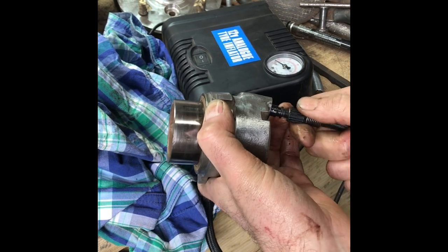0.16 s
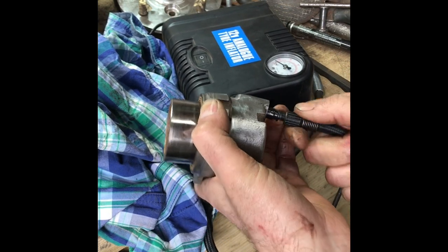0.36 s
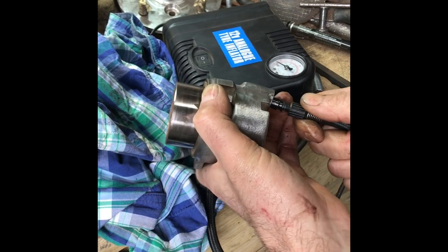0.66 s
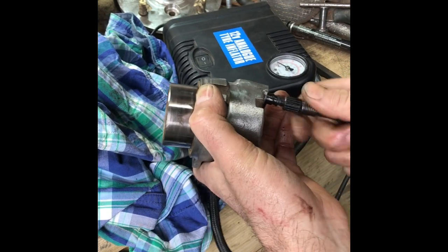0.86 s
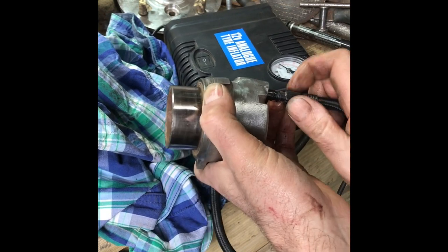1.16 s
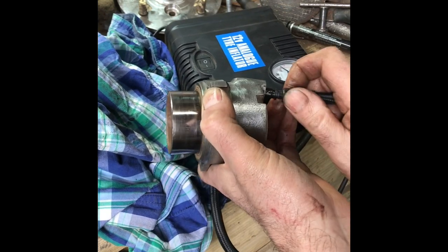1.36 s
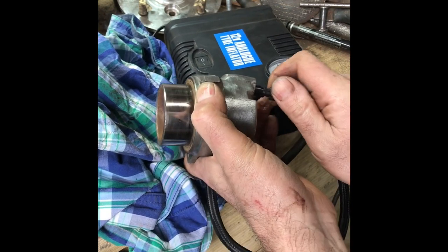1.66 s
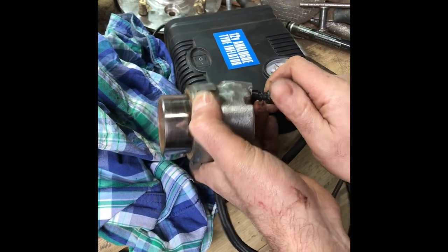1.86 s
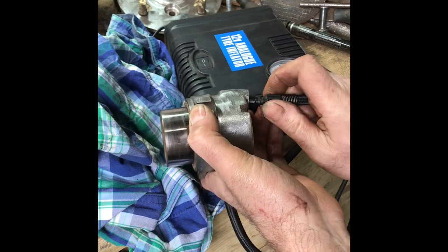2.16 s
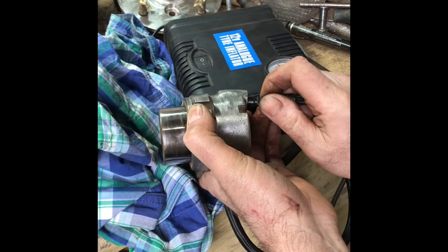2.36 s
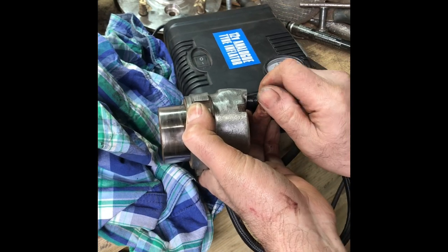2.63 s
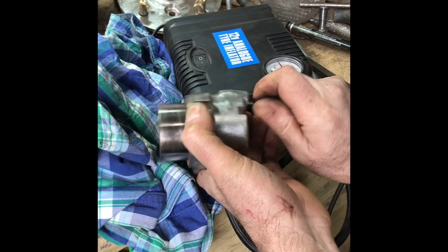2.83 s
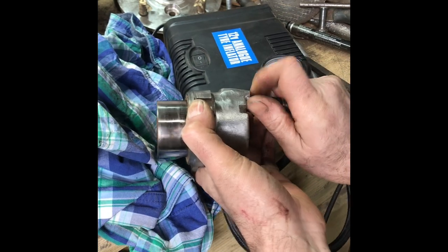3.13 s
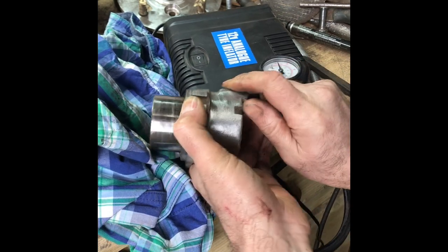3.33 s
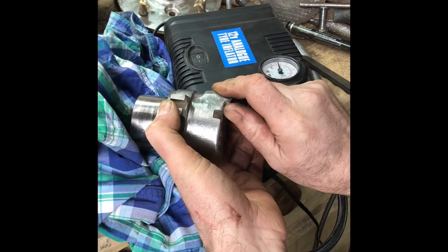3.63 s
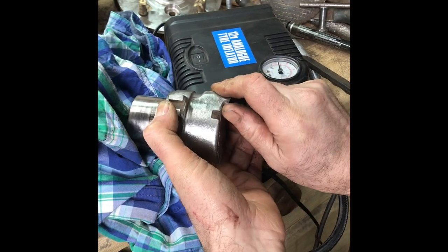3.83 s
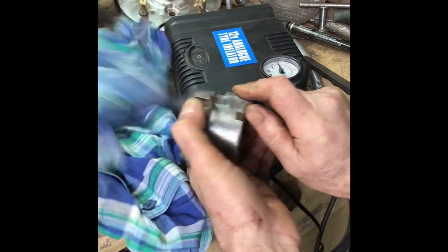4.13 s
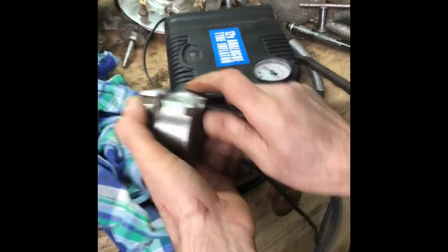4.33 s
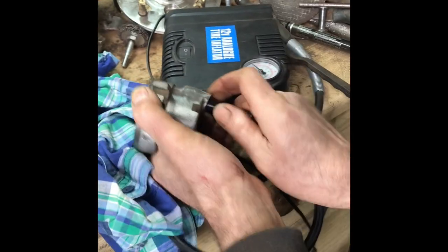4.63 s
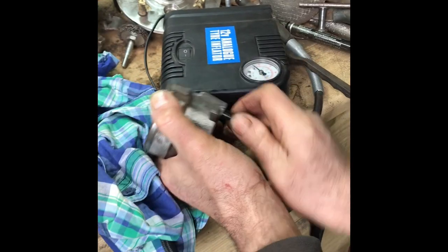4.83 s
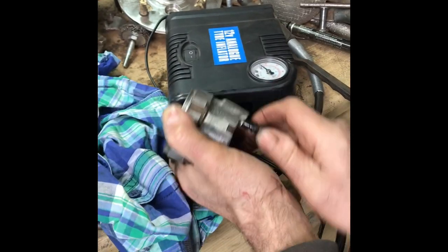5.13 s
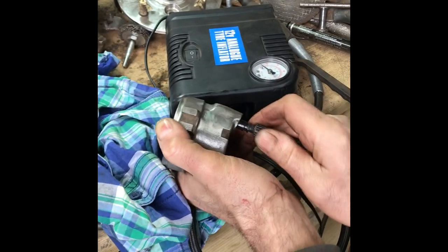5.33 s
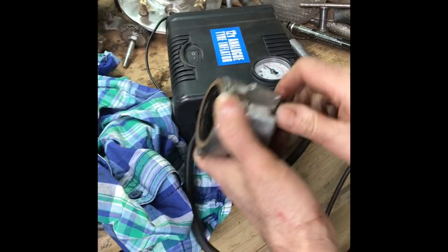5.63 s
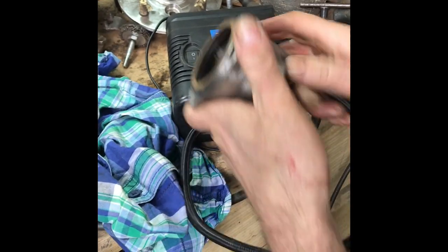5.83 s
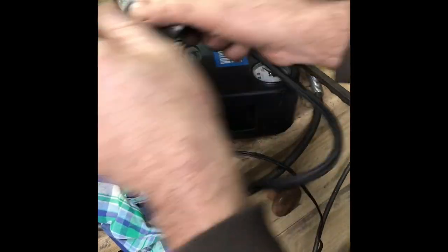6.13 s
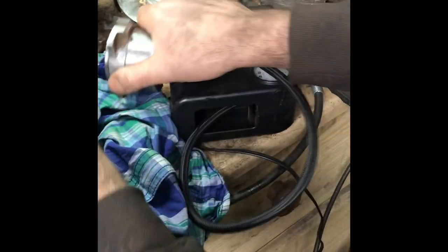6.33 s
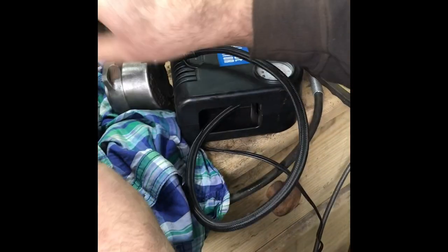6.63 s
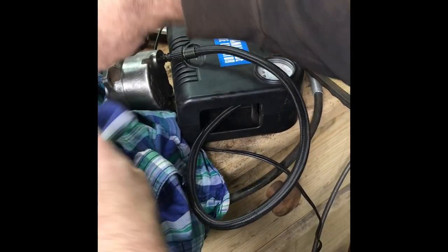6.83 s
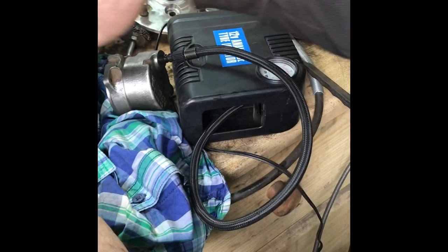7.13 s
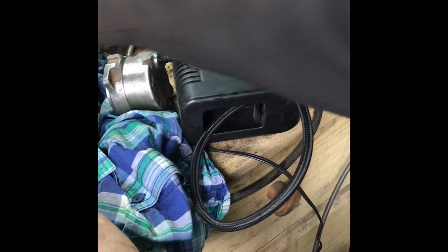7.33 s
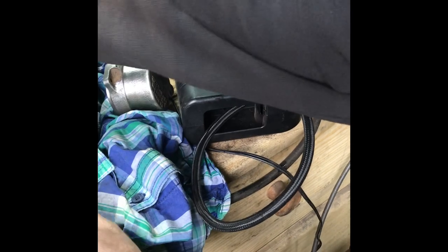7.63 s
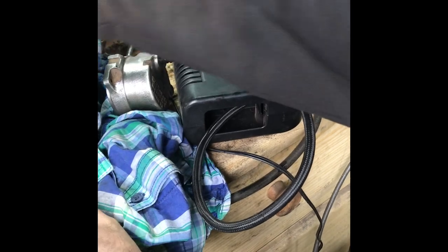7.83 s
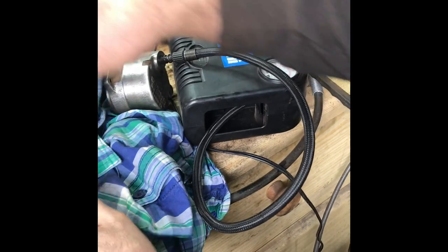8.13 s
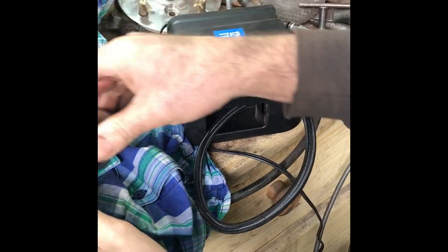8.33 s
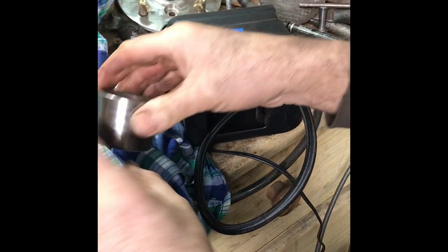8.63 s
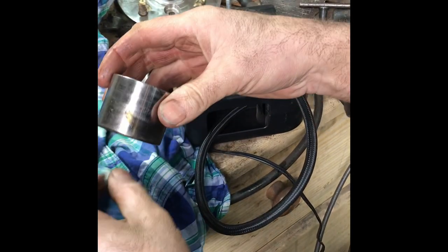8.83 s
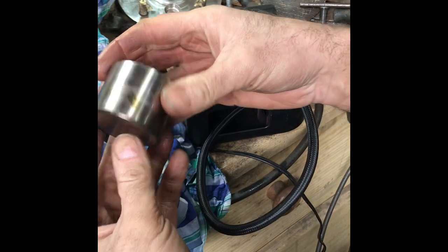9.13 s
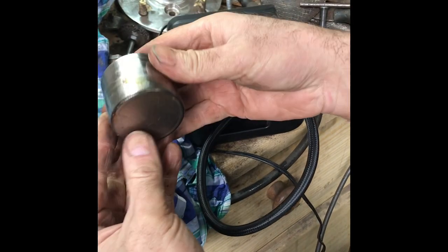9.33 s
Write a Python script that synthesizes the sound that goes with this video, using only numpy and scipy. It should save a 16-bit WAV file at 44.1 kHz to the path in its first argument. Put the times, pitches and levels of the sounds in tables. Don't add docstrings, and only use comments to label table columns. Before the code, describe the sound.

A small portable air compressor rattles fast and harsh on a wooden bench, with valve hiss and gear whine. It slows slightly under rising pressure, then a plug pops out with a hard hollow knock. The sound ducks suddenly, then swells back as the pump runs faster with hose puffs. A metal part thuds down and small pieces tinkle. Close, dry handheld microphone.

```python
import sys
import numpy as np
from scipy import signal
from scipy.fft import rfft, irfft
from scipy.io import wavfile
from scipy.ndimage import uniform_filter1d

SR = 44100
rng = np.random.default_rng(int(sys.argv[2]) if len(sys.argv) > 2 else 0)


def attenuation_scalar(level_db):
    decades = np.asarray(level_db, float) / 20
    return 10 ** decades


def wav_out(sig):
    wavfile.write(sys.argv[1], SR, np.round(np.clip(np.atleast_2d(sig).T, -1, 1) * 32767).astype(np.int16))


N = 418068

START_TURN, POP_S = .36, 4.105
LIGHT_TPS, FULL_TPS = 40.8, 39.1
PUMP_DB = -15.5
TEETH = 26
SWELL_DB = 0.55
JOLT_DB, JOLT_S = 15, 0.039
LEAN_REST_DB, RUB_REST_DB, EDGE_S = -55.5, -44.5, 0.054

# time_s, turns_per_s
CRANK_SPEED = [(0.0, 41.66), (0.8, 42.26), (1.2, 41.53), (1.6, 42.02), (2.0, 40.79), (2.3, 41.08),
               (2.45, 40.83), (2.8, 39.41), (3.4, 38.96), (4.1, 38.91), (4.17, 43.55), (4.3, 45.17),
               (4.8, 45.02), (5.4, 45.03), (5.8, 45.23), (6.6, 45.24), (7.4, 45.12), (9.48, 45.26)]
# turn, level_db
CONTACTS = [
    [(-.45, -3), (-.27, -40), (-.21, 1), (-.15, -16.5), (-.09, 13), (.0, -2), (.3, -2)],
    [(-.44, 0), (-.34, 2.5), (-.265, 0.5), (-.225, -1.5), (-.185, 4.5), (-.085, 6), (.12, 3)],
    [(-.56, -7), (-.529, -3), (-.498, 0), (-.467, -1), (-.2, -13), (.05, -14), (.25, -14)],
    [(-.5, -4), (-.37, -0.5), (-.24, -14), (-.11, -5), (.0, -14), (.14, -14), (.32, -6.5)],
]
# pitch_hz, width_hz, level_db
LOADED_MODES = [
    [(379, 16, -23.5), (399, 47, -8), (480, 160, -7.5), (606, 36, -7), (719.6, 68, 1.5), (806, 27, -10)],
    [(1054, 57, 13.5), (1234, 220, -0.5), (908, 150, 10)],
    [(1570, 120, 0)],
    [(1781, 32, 3.5), (1705, 69, 4), (1967, 33, -3), (2100, 21, -9)],
]
# pitch_hz, width_hz, level_db
FREE_MODES = [
    [(370.4, 18, -5.5), (452, 49, -8), (575.5, 35, -8), (595, 110, -8.5), (679.4, 55, 6), (816.6, 15, -1)],
    [(1127, 150, -10.5), (1048, 290, -4), (953, 67, -6.5)],
    [(1450, 70, 0)],
    [(1648, 82, 10.5), (1784, 54, 2), (2060, 31, 1)],
]
UNEVEN_DB = [2, 3, 4.5, 4]
GRIND_DB = [-7, -6, -7, -5]
# pitch_hz, width_hz
CONTACT_FOCUS = [
    (560, 1050),
    (1100, 520),
    (1470, 280),
    (1850, 800),
]
FLUTTER_DB = [0, 0, 3.5, 0]
BEARING_PLAY = (.15, .17, .33, 0)
# light_db, full_db, free_db, clear_gain_db (gained with the vents clear)
PART_LEVELS = [
    (-4.5, -5, -4.5, 2.5),
    (-3, -7.5, -6.5, 1.9),
    (-17, -8.5, -17.5, 7.5),
    (-12, -8, -10.5, -1),
]
# turn, low_hiss_db, high_hiss_db, whine_db, tooth_tone_db
BREATH = [(0, 0, 1, -11, 10), (.15, 1, -0.5, -11, 0), (.3, -0.5, 0.5, 5, -1), (.45, 2, 3, 5, -5.5),
          (.6, 1, 2, 9.5, -11), (.7, 6.5, 6, -1.5, -62), (.85, 5.5, 4.5, 4.5, 2), (1, 4.5, -4, -4, 10)]
MESH_DB = [-23.5, -34]
# pitch_hz, level_db (per Hz)
HISS_COLOUR = [(1290, 22), (2200, 6.5), (2770, 0.5), (2930, 0), (3910, -1), (4430, -4), (4800, -3.5),
               (7130, -7.5), (7740, -12.5), (8540, -10), (10400, -15.5), (11600, -13), (15700, -8.5)]
# pitch_hz, width_hz, loaded_gain_db, free_gain_db
HISS_PEAKS = [(2612, 40, 4.5, 4.5), (2952, 48, 10, 7.5), (3340, 64, 5, 4), (3645, 35, 4.5, 6.5),
              (4530, 66, 2.5, 0), (4960, 62, 2.5, 3.5), (5240, 95, 8.5, 3), (5960, 140, 5.5, 6),
              (6350, 90, 1.5, 1.5), (7100, 130, 2, 6.5), (10600, 250, -3.5, -2.5), (11400, 720, 2, 5.5),
              (13700, 590, -1, 1)]
# light_db, full_db, free_db, clear_gain_db
AIR_LEVELS = [
    (-7.5, -7.5, -8, 0),
    (-13, -13, -13, 1.7),
    (-20, -15, -16.5, 5),
]
# light_hz, full_hz, free_hz, clear_gain_hz
WHINE_HZ = (4430, 4280, 4450, 15)
# light_hz, full_hz, free_hz, clear_gain_hz
WANDER_HZ = (15, 12, 55, 10)
# time_s, level_db (against the whine)
WHISTLE_LEVEL = [(0, -22), (5.5, -17), (6.3, -9), (9.48, -14)]
# pitch_hz, width_hz
WHISTLE_MODE = (7280, 180)
SHAKE_MULTIPLES = (1, 3, 4, 5, 6, 7)
# light_db, full_db, free_db, clear_gain_db
SHAKE_LEVELS = [(-47, -39, -34.5, 3), (-56, -38, -32, 6), (-34.5, -29, -37.5, -10), (-33, -34.5, -31, 2.5),
                (-28, -32, -33, 4.5), (-40.5, -28, -44.5, 3)]
# start_s, length_s, level_db (at twice the crank speed)
LEANS = [(-.1, 1.4, -41.5), (1.36, 0.24, -39), (1.62, .38, -36.5), (2.24, .3, -37), (2.5, 0.39, -46),
         (2.86, .4, -42), (4.5, 0.36, -52), (5, 1.05, -48), (6.26, 0.23, -39), (6.66, 3.1, -39.5)]
# start_s, length_s, level_db
RUBS = [(1.1, .2, -44), (1.3, 0.37, -37), (1.7, .25, -44), (1.97, 0.35, -37), (2.85, .2, -47),
        (3.1, 1, -46), (4.32, 0.15, -45), (5.05, .35, -50), (5.6, 0.28, -56), (6.3, .35, -41)]
# time_s, clear_share (0 to 1)
VENTS_CLEAR = [(0, 0.22), (5.6, 0.04), (6.5, 0.52), (7.4, 1), (8.1, 0.88), (8.5, 0.87), (9.48, 0.67)]
# time_s, level_db
PANEL_REFLECTION = [(0, 2.1), (2.2, -1), (2.7, 1.3), (4.1, 0.2), (4.25, -1), (4.6, -0.5), (5.1, -0.3),
                    (6.2, 1.7), (7.4, -2), (8.2, 2.6), (9.48, 2.5)]
# time_s, level_db
HOSE_AIM = [(4.1, 0.2), (4.2, 12), (4.45, 12.5), (4.7, 9.5), (5.5, 5), (5.87, 15), (6.1, 9.5), (6.4, 9),
            (6.55, 0.5), (8, -7.5)]
# since_pop_s, level_db
DUCK = [(0, 0), (.001, -8), (.07, -12), (.13, -16), (.2, -14.5), (.225, -8.5), (.47, -8), (1.1, -2.5),
        (1.9, -0.68)]
# start_s, peak_db, brightness_hz
POP_KNOCKS = [(4.1045, -4, 8900), (4.1062, 3.5, 1490), (4.112, -3, 1430), (4.118, -1, 900),
              (4.131, -7, 1300), (4.151, -11, 700), (4.162, -36, 900), (4.186, -25, 1530),
              (4.203, -26, 1410)]
# start_s, peak_db, brightness_hz
THUD_KNOCKS = [(4.221, -21, 300), (4.335, -25, 200), (4.37, -47, 200), (4.392, -36, 100), (6.28, -35, 150),
               (6.455, -18, 252), (6.473, 0, 350), (6.492, -17, 250), (6.515, -24, 200), (6.54, -21, 150)]
# start_s, peak_db, brightness_hz
TINKS = [(6.245, -17, 15000), (8.2, -27, 15400), (8.29, -14, 15000), (8.31, -22, 13000)]
# pitch_hz, level_db, t60_s (time to fade by 60 dB)
CYLINDER_MODES = [(150, -14.5, 0.17), (263, -6.5, 0.16), (327, 1, 0.04), (436, 5.5, 0.043),
                  (595, -6, 0.052), (880, 6, 0.024), (1244, 3, 0.063), (1470, -6, 0.045), (3500, 5, 0.009),
                  (5000, 8, 0.009)]
# pitch_hz, level_db, t60_s
BENCH_MODES = [(86.4, -2, 0.18), (145, 1.5, 0.15), (198, -3, 0.072), (300, -10, 0.062)]
# pitch_hz, level_db, t60_s
METAL_MODES = [(5770, -3, .06), (6340, -5, .05), (7140, 5, 0.11), (7350, -4, .08), (8400, 2, .04)]


def unit(x):
    return x / np.sqrt(np.mean(x ** 2) + 1e-20)


def columns(rows, at):
    first, *rest = np.transpose(rows)
    return [np.interp(at, first, c) for c in rest]


def over_time(table):
    return columns(table, np.arange(N) / SR)[0]


def highpass(x, order, cutoff_hz):
    return signal.sosfilt(signal.butter(order, cutoff_hz, "high", fs=SR, output="sos"), x)


def resonate(x, hz, width_hz):
    r = np.exp(-np.pi * width_hz / SR)
    gain = (1 - r * r) / 2
    return signal.lfilter([gain, 0, -gain], [1, -2 * r * np.cos(2 * np.pi * hz / SR), r * r], x)


def band(low_hz, high_hz, order=3):
    sos = signal.butter(order, [low_hz, high_hz], "band", fs=SR, output="sos")
    return unit(signal.sosfilt(sos, rng.standard_normal(N)))


def state(speed, light, full, free, clear_gain):
    loaded = np.interp(-speed, [-LIGHT_TPS, -FULL_TPS], [light, full])
    return np.where(np.arange(N) < POP_S * SR, loaded, free + clear_gain * over_time(VENTS_CLEAR))


def touches(rows, rest_db):
    t = np.arange(N) / SR
    gain = attenuation_scalar(rest_db)
    for start_s, length_s, db in rows:
        nearest_edge = np.minimum(t - start_s, start_s + length_s - t)
        gain = gain + attenuation_scalar(db) * np.clip(nearest_edge / EDGE_S, 0, 1)
    return gain


def contact_force(k, turns, loose):
    angle, strength_db = np.transpose(CONTACTS[k])
    whole = np.arange(1, int(turns[-1]) + 1)[:, None]
    timing, strength, each = rng.standard_normal((3, len(whole), len(angle)))
    creep = 3 * uniform_filter1d(timing, size=25, axis=0)
    at = np.interp(whole + angle, turns, np.arange(N)).astype(int)
    slip = .0003 * SR * loose[at] * (creep + timing)
    size_db = strength_db + UNEVEN_DB[k] * loose[at] * (strength[:, :1] + 0.4 * each)
    size_db = size_db + FLUTTER_DB[k] * (-1.) ** whole * (at > round(POP_S * SR))
    force = np.zeros(N)
    np.add.at(force, np.clip(at + slip.astype(int), 0, N - 1), attenuation_scalar(size_db))
    return unit(force)


def pump(turns, speed, overall, parts):
    loose = state(speed, *BEARING_PLAY)
    grind = rng.standard_normal(N) * attenuation_scalar(columns(BREATH, turns % 1)[0]) * np.sqrt(2 * loose)
    split = round(POP_S * SR)
    out = 0
    for k, part_db in enumerate(parts):
        force = contact_force(k, turns, loose) + attenuation_scalar(GRIND_DB[k]) * grind
        force = resonate(force, *CONTACT_FOCUS[k])
        sound = np.zeros(N)
        for modes, span in ((LOADED_MODES[k], slice(0, split)), (FREE_MODES[k], slice(split, N))):
            rung = sum(attenuation_scalar(db) * resonate(force, hz, width) for hz, width, db in modes)
            sound[span] = unit(rung[span])
        out = out + attenuation_scalar(overall + part_db) * sound
    return highpass(out, 6, 322)


def gears(turns, overall):
    angle = 2 * np.pi * TEETH * (turns + 0.0027 * np.sin(2 * np.pi * (turns + 0.24)))
    tone = sum(attenuation_scalar(db) * np.sin((k + 1) * angle) for k, db in enumerate(MESH_DB))
    return tone * attenuation_scalar(overall + 11.0 + columns(BREATH, turns % 1)[3])


def hiss():
    hz = np.fft.rfftfreq(N, 1 / SR) + 1
    colour = columns([(np.log(f), d) for f, d in HISS_COLOUR], np.log(hz))[0]
    grit = attenuation_scalar(2.2 * np.minimum(rng.exponential(1, N), 5))
    noise = rfft(rng.standard_normal(N) * grit)
    upper = 1 / (1 + (6500 / hz) ** 12)
    lower = (1 - upper) / (1 + (2200 / hz) ** 12)
    loaded = np.arange(N) < POP_S * SR
    low, high = np.zeros((2, N))
    for k, span in enumerate((loaded, ~loaded)):
        peaks = sum(db[k] / (1 + (2 * (hz - f) / w) ** 2) for f, w, *db in HISS_PEAKS)
        shaped = noise * attenuation_scalar(colour + peaks)
        low[span] = unit(irfft(shaped * lower, N))[span]
        high[span] = unit(irfft(shaped * upper, N))[span]
    return low, high


def case_whine(speed):
    wobble = 1.8 + band(20, 86, order=1) + 1j * band(17.0, 63, order=1)
    pitch = state(speed, *WHINE_HZ) + state(speed, *WANDER_HZ) * band(3.02, 62, order=1)
    return unit((wobble * np.exp(2j * np.pi * np.cumsum(pitch) / SR)).real)


def vent_whistle():
    noise = rng.standard_normal(N)
    return unit(resonate(resonate(noise, *WHISTLE_MODE), *WHISTLE_MODE))


def air(turns, speed, overall):
    low_db, high_db, whine_db = (state(speed, *row) for row in AIR_LEVELS)
    gate_low, gate_high, gate_whine, _ = columns(BREATH, turns % 1)
    low, high = hiss()
    low = low * attenuation_scalar(low_db - 4.0 + gate_low)
    high = high * attenuation_scalar(high_db + gate_high + SWELL_DB * band(2.3, 10.4, order=1))
    whine = case_whine(speed) * attenuation_scalar(whine_db - 5.5 + gate_whine)
    whistle = vent_whistle() * attenuation_scalar(whine_db + over_time(WHISTLE_LEVEL) + gate_high)
    return (low + high + whine + whistle) * attenuation_scalar(overall)


def bench_shake(turns, speed, overall):
    gains = [touches(LEANS, LEAN_REST_DB)]
    gains += [attenuation_scalar(overall + state(speed, *row)) for row in SHAKE_LEVELS]
    shake = 0
    for k, gain in zip((2, *SHAKE_MULTIPLES), gains):
        shake = shake + np.sqrt(2) * gain * np.sin(2 * np.pi * k * turns + k * k)
    return shake


def rubbing_hands():
    lumps = attenuation_scalar(-2.0 + 1.4 * band(15, 16.7, order=1))
    return band(65, 288) * touches(RUBS, RUB_REST_DB) * lumps


def knocks(events, modes):
    out = np.zeros(N)
    t = np.arange(SR // 2) / SR
    for start_s, peak_db, bright_hz in events:
        ring = 0
        for (hz, level, t60), vary_db in zip(modes, rng.normal(0, 1.8, len(modes))):
            fade = attenuation_scalar(level + vary_db - 60 * t / t60)
            ring = ring + fade * np.sin(2 * np.pi * hz * t) / (1 + (hz / bright_hz) ** 2)
        ring = ring * (1 - np.exp(-t * 5.4 * bright_hz))
        i = round(start_s * SR)
        out[i:i + len(t)] -= attenuation_scalar(peak_db) * ring / np.abs(ring).max()
    return out


def scene():
    speed = over_time(CRANK_SPEED)
    since_pop = np.arange(N) / SR - POP_S
    turns = START_TURN + np.cumsum(speed) / SR
    overall = PUMP_DB + columns(DUCK, since_pop)[0]
    thump, case, hose, valve = (state(speed, *row) for row in PART_LEVELS)
    jolt = JOLT_DB * (since_pop > 0) * np.clip(1.5 - since_pop / JOLT_S, 0, 1)
    case = case + over_time(PANEL_REFLECTION) + jolt
    hose = hose + over_time(HOSE_AIM)
    machine = pump(turns, speed, overall, (thump, case, hose, valve))
    machine = machine + gears(turns, overall) + air(turns, speed, overall)
    machine = machine + bench_shake(turns, speed, overall) + rubbing_hands()
    pop = knocks(POP_KNOCKS, CYLINDER_MODES)
    thuds = highpass(knocks(THUD_KNOCKS, BENCH_MODES), 3, 60)
    tinks = knocks(TINKS, METAL_MODES)
    return (machine + pop + thuds + tinks)[None]


def roll_off(x):
    return signal.sosfilt(signal.butter(12, 16980, fs=SR, output="sos"), x)


def record(dry):
    dry = highpass(dry, 3, 42)
    dry = signal.sosfilt(signal.ellip(14, .5, 80, 15700, fs=SR, output="sos"), dry)
    mix = 1.236 * np.tanh(dry / 1.163)
    return roll_off(mix)


dry = scene()
out = record(dry)
wav_out(out)
```